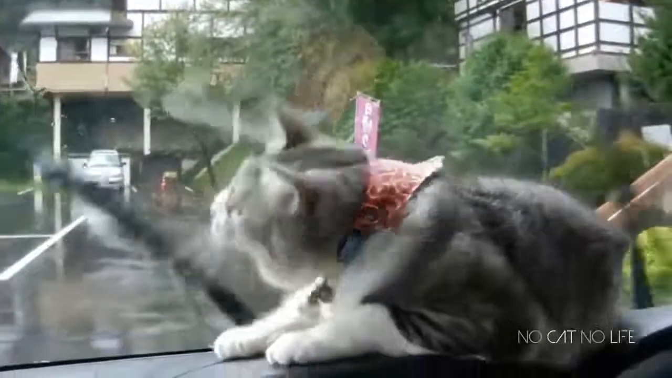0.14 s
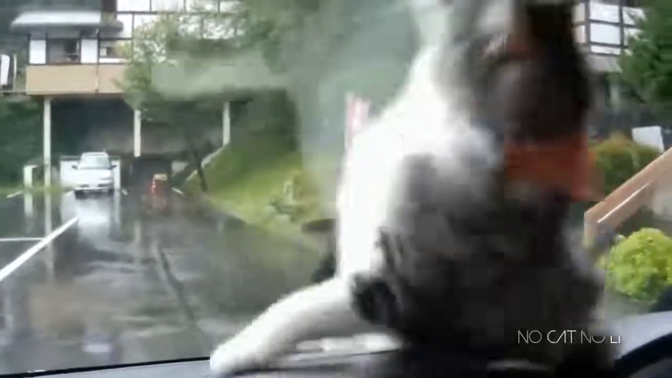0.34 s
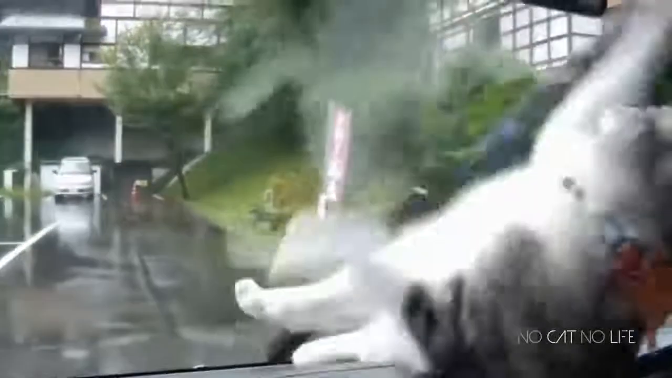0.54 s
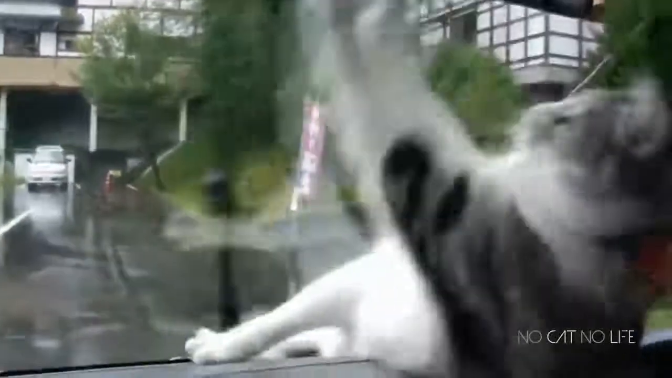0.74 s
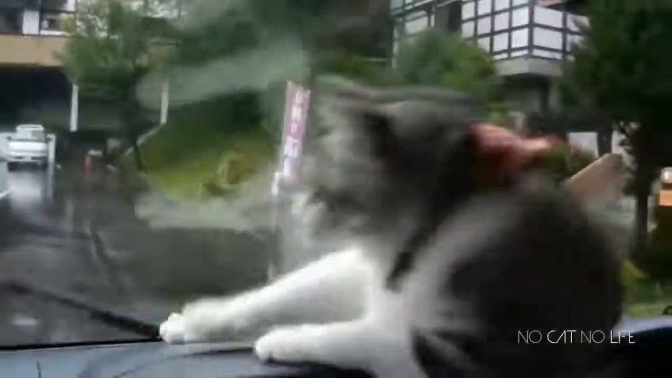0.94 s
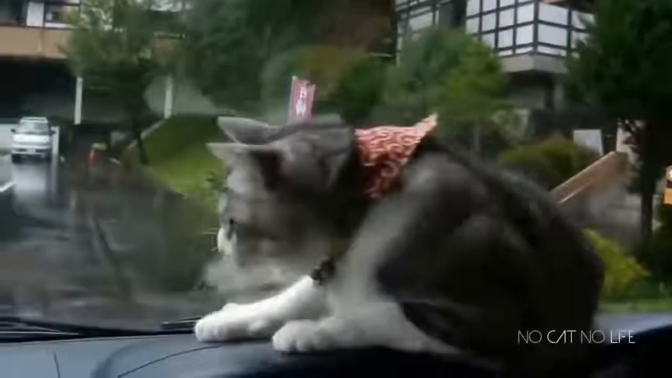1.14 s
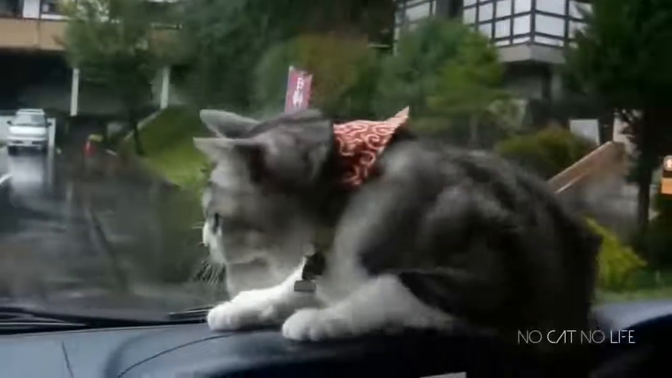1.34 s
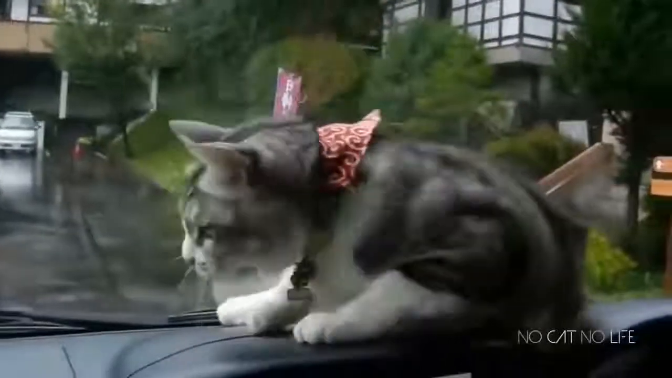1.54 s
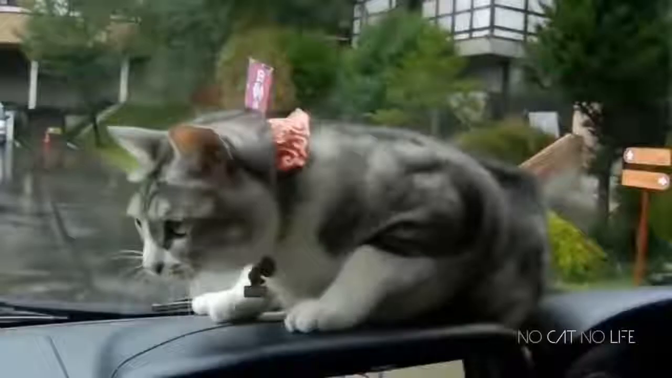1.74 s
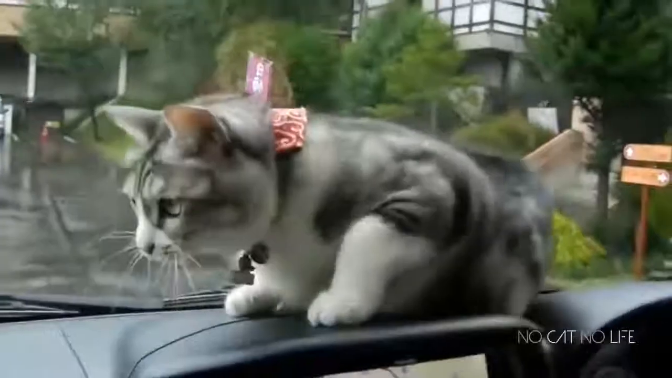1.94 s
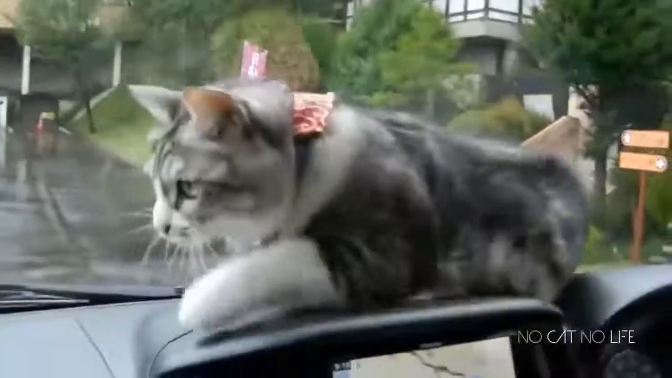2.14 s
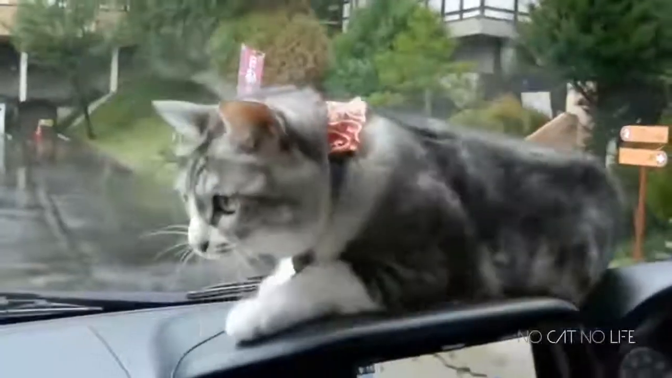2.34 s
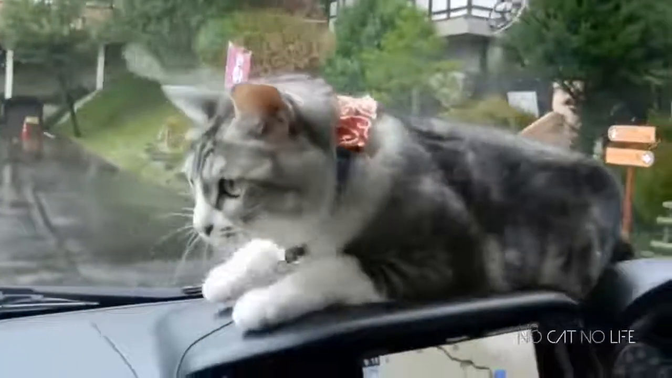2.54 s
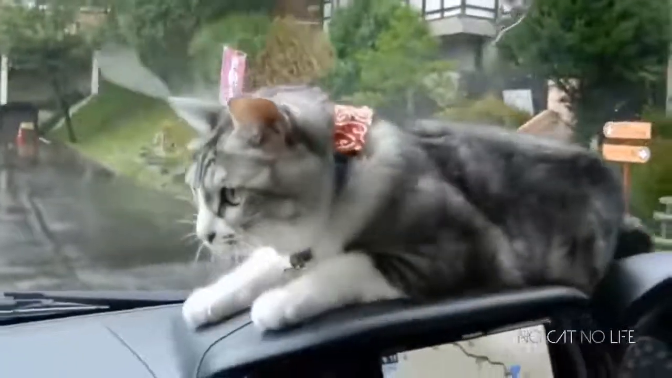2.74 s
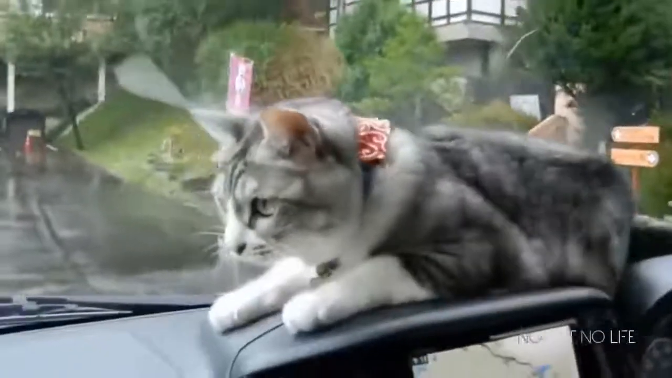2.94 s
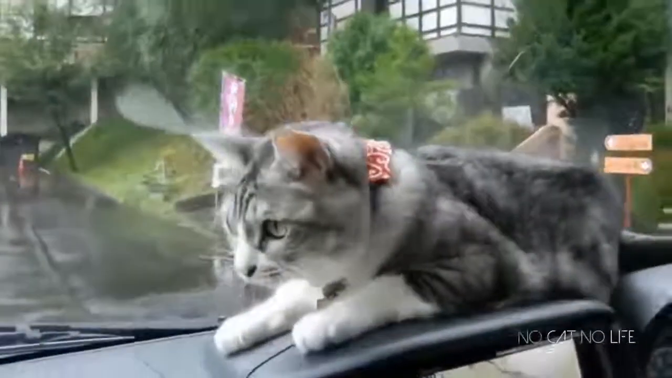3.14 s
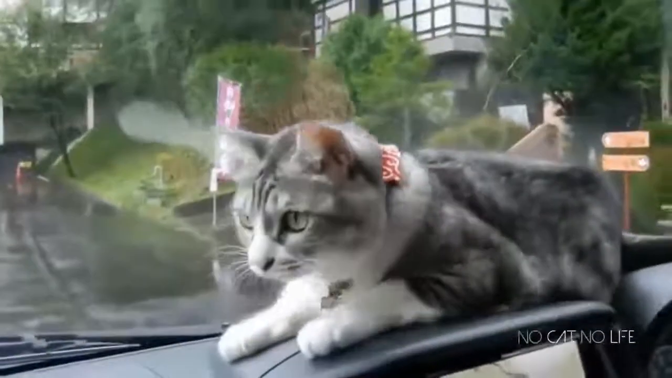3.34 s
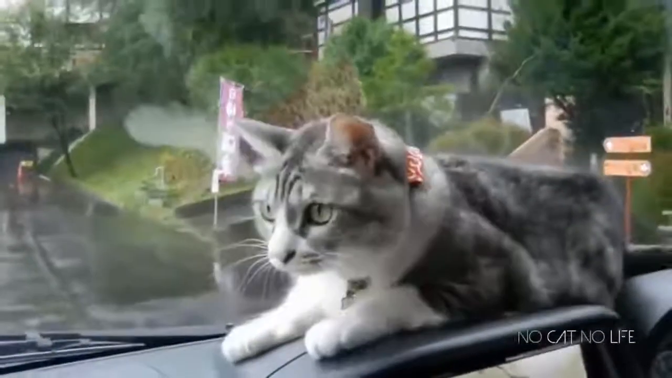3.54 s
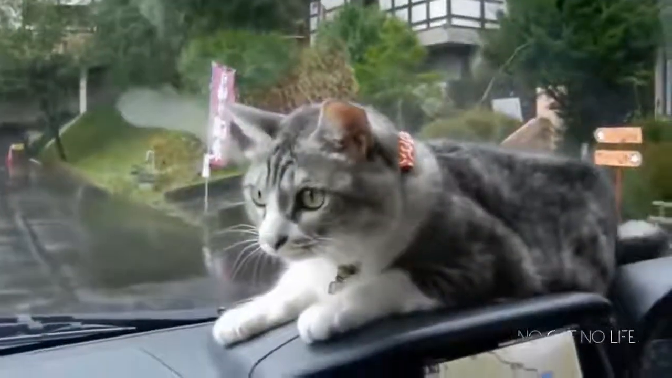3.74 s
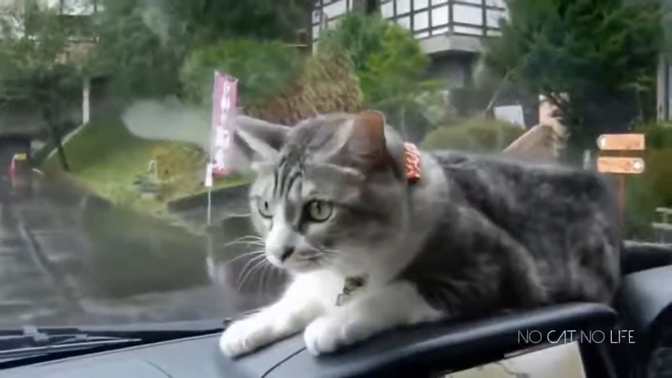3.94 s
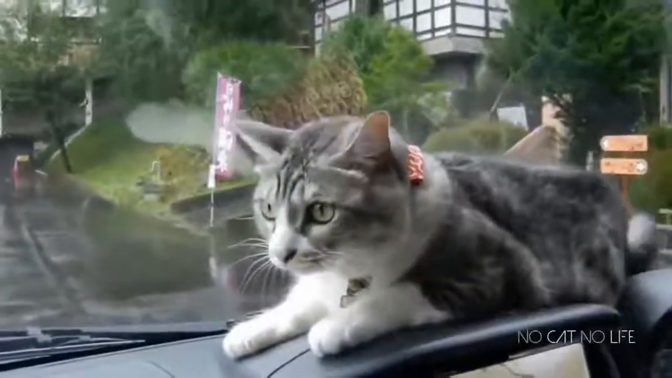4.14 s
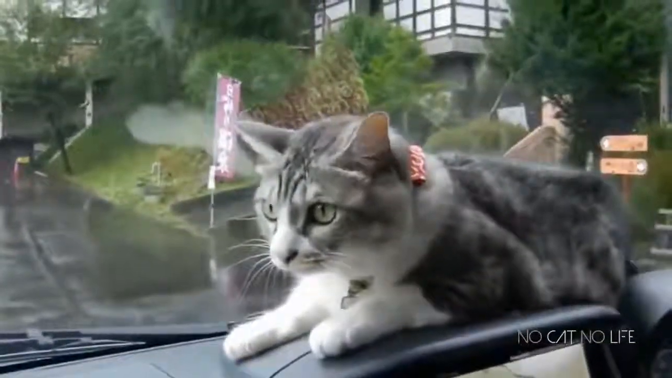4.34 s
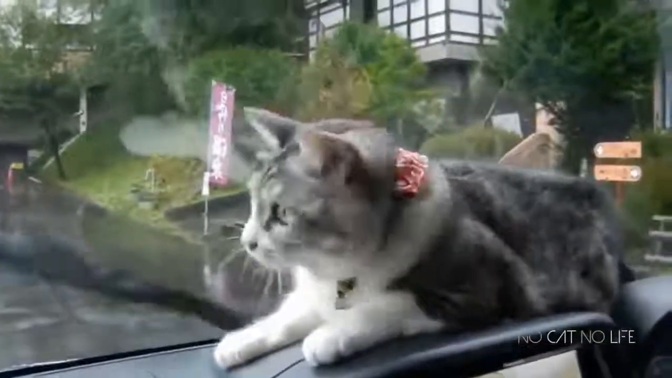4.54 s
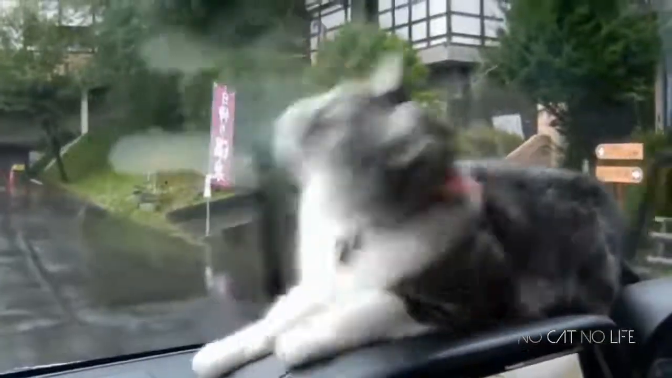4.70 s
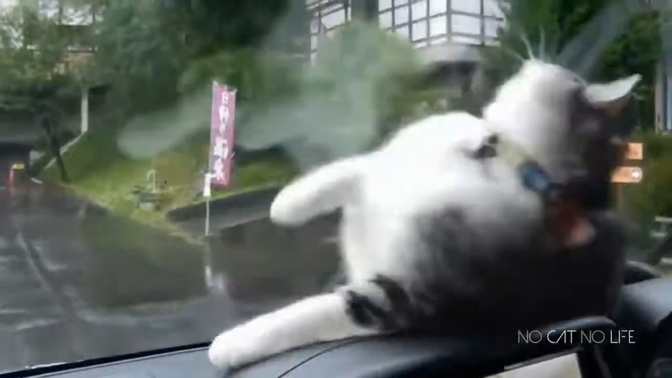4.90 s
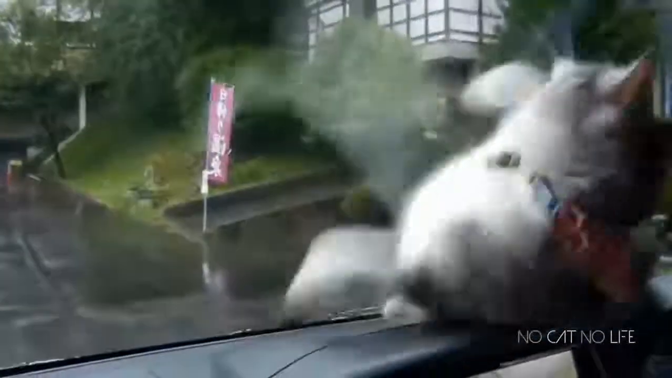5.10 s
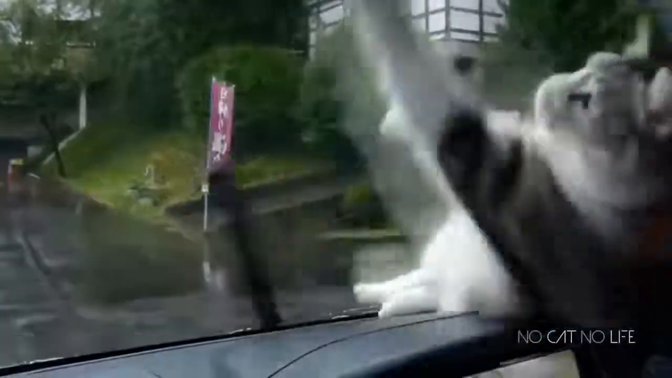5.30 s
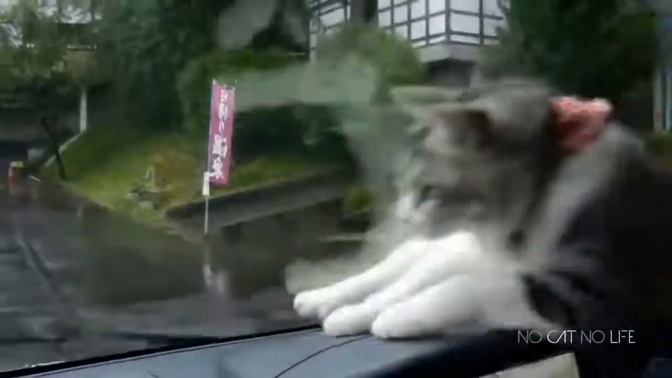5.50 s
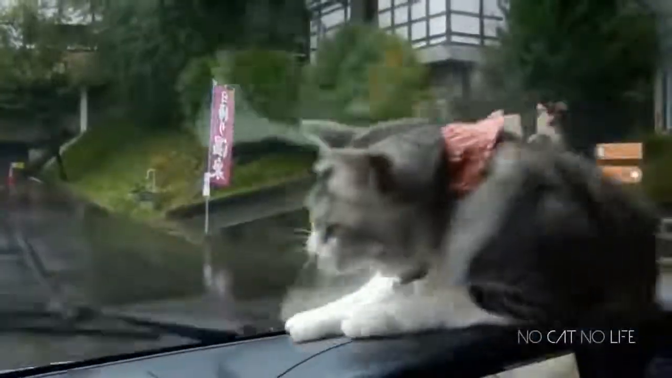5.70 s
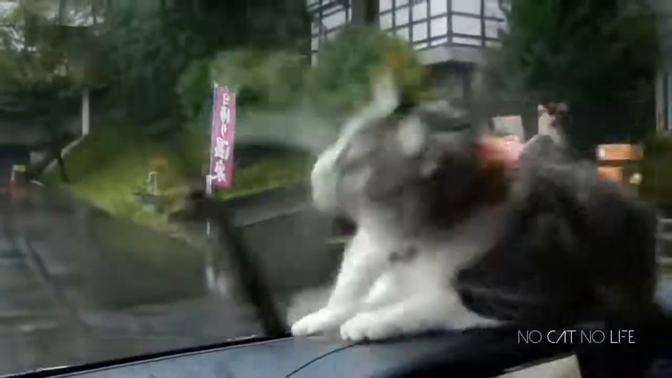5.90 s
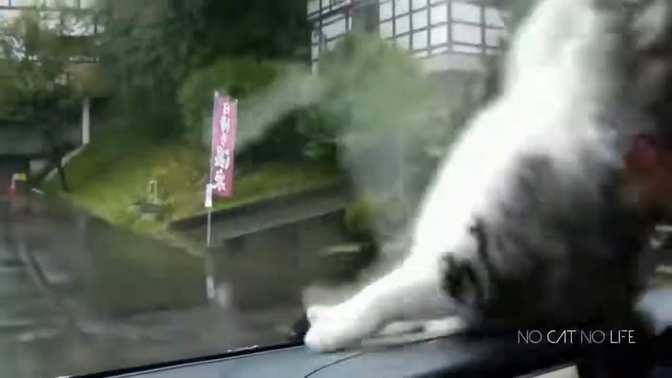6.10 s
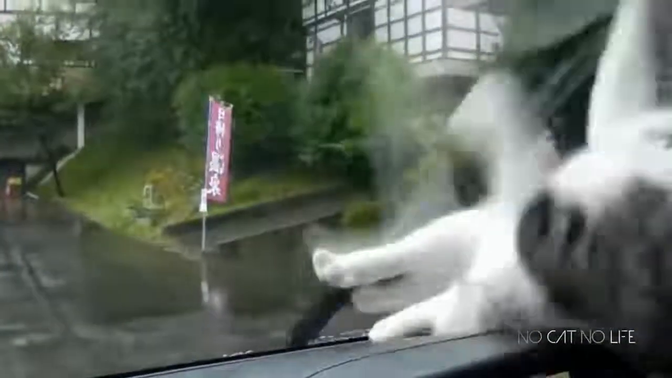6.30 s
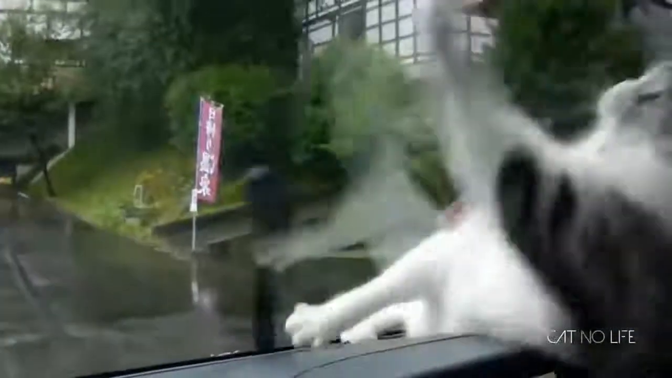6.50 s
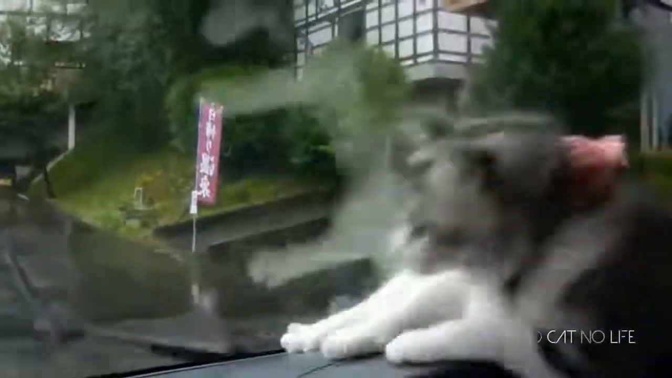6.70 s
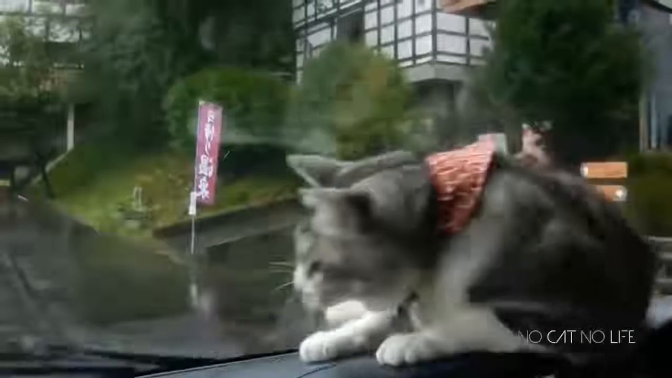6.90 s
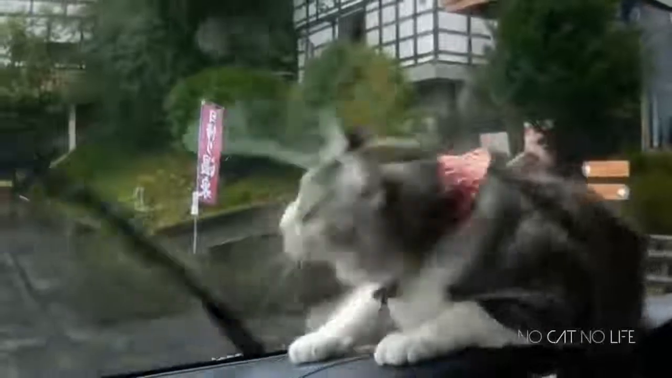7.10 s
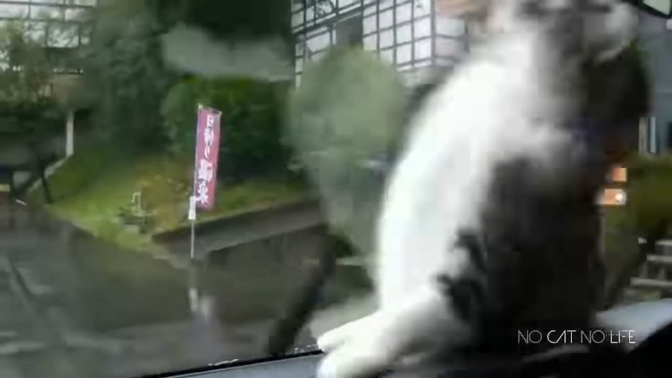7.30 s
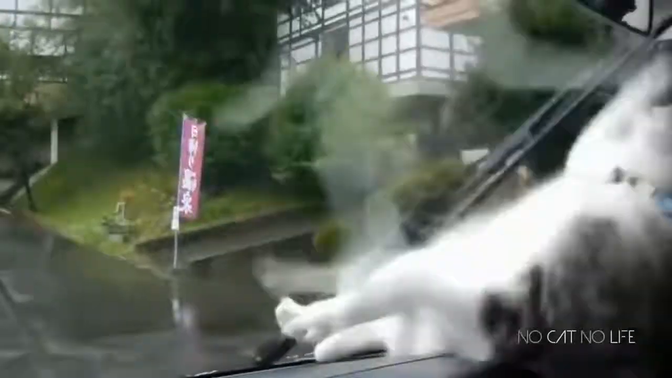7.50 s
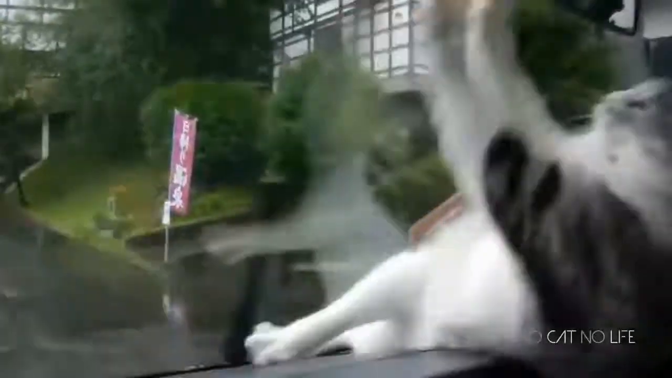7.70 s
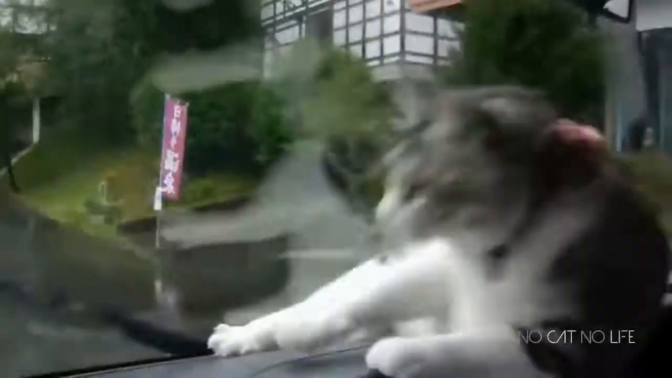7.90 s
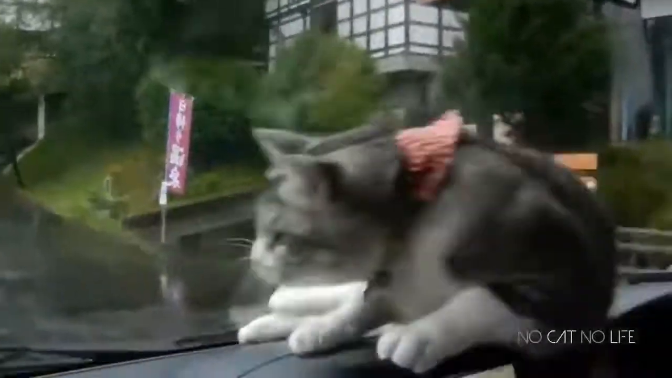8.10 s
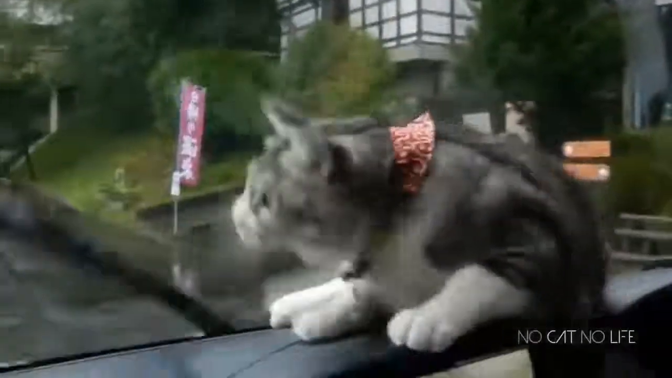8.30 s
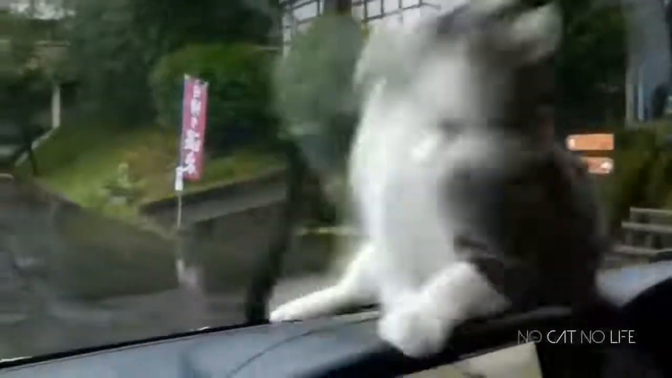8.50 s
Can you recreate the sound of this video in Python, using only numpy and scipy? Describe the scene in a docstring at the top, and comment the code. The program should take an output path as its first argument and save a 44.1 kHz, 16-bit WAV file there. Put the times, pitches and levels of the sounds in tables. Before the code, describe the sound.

Inside an idling car, a microphone near the dashboard picks up a steady low engine boom. The wipers shudder, swish once across wet glass, knock and chirp, while a cat slaps the windscreen and thuds onto the hollow dash, its collar bell jingling. After a lull with soft shuffling and paw steps, the wipers sweep repeatedly and the cat chases them with more slaps, scratches, rustles and jingles.

```python
"""Cat chasing the windscreen wipers

Inside a car idling in light rain, one microphone close to the dashboard, over the engine's boom.
The wiper blades shudder as they set off, swish over wet glass, knock at the top and chirp at the bottom.
A cat slaps the glass, lands on the hollow dash, rustles and jingles its collar bell."""
import sys
import numpy as np
from scipy import signal
from scipy.fft import rfft, irfft, next_fast_len
from scipy.io import wavfile
from scipy.ndimage import uniform_filter1d, map_coordinates

SR = 44100
rng = np.random.default_rng(int(sys.argv[2]) if len(sys.argv) > 2 else 0)


def to_wav(sig):
    """Store sig (one row per channel, or 1-D mono) as 16-bit WAV at the path in sys.argv[1].

    Samples outside -1..1 are clipped; the rate is SR.
    """
    pcm = np.clip(np.atleast_2d(sig), -1, 1) * 32767
    pcm = np.round(pcm).astype(np.int16)
    wavfile.write(sys.argv[1], SR, pcm.T)  # frames by channels


N = 377034

# echo of the cabin: (frequency [Hz], t60 [s])
CABIN_DECAY = [(100, 0.59), (1000, 0.13), (4000, 0.23), (12000, 0.046)]
# idle speed: (time [s], firing rate [Hz])
IDLE_SPEED = [(0, 21.37), (.78, 21.35), (.85, 21.06), (2.24, 21.08), (2.45, 21.35), (6.57, 21.35),
              (6.69, 21.05), (8.55, 21.03)]
# engine orders in the cabin: (multiple of the firing rate [ratio], level [dB])
ENGINE_ORDERS = [(1, -56), (2, -41), (3, -47), (4, -28), (5, -43), (6, -39.5), (7, -51), (8, -42.5),
                 (9, -44.5), (10, -48), (11, -58.5), (12, -60), (17, -51.5), (20, -52), (25, -57),
                 (30, -60.5), (34, -59)]
# rush of air around the microphone: (frequency [Hz], level [dB])
RUSH_SPECTRUM = [(20, -40), (33, -6.5), (49, 9), (60, -2.5), (72, -0.5), (98, 3.5), (118, 0), (150, -0.5),
                 (195, -5.5), (260, -12), (360, -10), (500, -16), (750, -19.5), (1300, -26.5),
                 (2400, -30.5), (4000, -39), (8000, -45.5), (12000, -46)]

# wiper sweeps: (blades break free [s], shudder before that [s], shudder [dB], closing tick [dB],
# motor load [dB], dip in level afterwards [dB])
WIPER_SWEEPS = [(.191, .07, -25, -18, -2, 5), (4.684, .048, -22, -20, 0, 3),
                (5.933, .08, -21.5, -20, -2, 6), (7.176, .081, -20.5, -20, -3, 7),
                (8.421, .085, -22, -18, -5.5, 3)]
# the blades rest after the first sweep:
# (time [s], shudder before that [s], shudder [dB], closing tick [dB], dip in level afterwards [dB])
WIPER_PARK = (1.353, .008, -25, -19, 3)
# the motor over one sweep: (time after breaking free [s], pitch [Hz], level [dB])
MOTOR_WHINE = [(.05, 1050, -68), (.28, 1160, -53), (.44, 1270, -54), (.5, 1314, -46.5), (.58, 1320, -47),
               (.66, 1320, -58), (.76, 1170, -62), (.9, 1250, -54), (1.02, 1318, -50), (1.14, 1316, -52),
               (1.27, 1335, -54)]
# rubbing over one sweep, loudest high on the glass: (time after breaking free [s], level [dB])
RUB_LEVELS = [(-.1, -68), (.04, -54), (.2, -56.5), (.42, -47.5), (.65, -43), (.85, -52.5), (1.12, -48),
              (1.28, -62)]
# rubber on wet glass: (frequency [Hz], level [dB])
WET_GLASS_SPECTRUM = [(150, -2), (400, 24), (900, 19), (1600, 8.5), (2800, 7), (4200, 3), (6500, 5),
                      (8500, -1), (12000, -1)]
# hard slips of the blades: (time [s], peak [dB], ring of the glass against that [dB])
BLADE_JOLTS = [(0.138, -17, -22), (0.162, -19.5, -14), (1.345, -18, -20), (4.641, -21, -18),
               (4.679, -16, -19), (5.251, -18.5, -26), (5.275, -19, -21), (5.853, -18, -13),
               (5.894, -16, -17), (5.908, -26, -7), (7.095, -22, -16), (7.109, -18, -22),
               (7.152, -14.5, -10), (8.336, -16, -10.5), (8.389, -19, -11), (8.405, -21.5, -2)]
# the blades turn at the top: (knock time [s], shudder's head start [s], shudder length [s],
# shudder [dB], thud [dB], knock against thud [dB])
TOP_TURNS = [(0.799, .01, 0.057, -28.5, -22.5, -1), (5.314, 0.063, 0.099, -28, -16.5, -4),
             (6.553, 0.012, .065, -27.5, -19, -9), (7.801, 0.016, .06, -32.5, -17.5, -6)]
# the rubber lips flip at the bottom: (time [s], squeak [dB])
LIP_FLIPS = [(1.272, -38.5), (5.773, -38), (7.021, -40), (8.262, -41)]

# the windscreen's resonances: (frequency [Hz], width [Hz], level [dB])
SCREEN_MODES = [(112, 32, -1), (145, 48, 0), (196, 32, -6), (268, 45, -10.5), (372, 50, -11),
                (430, 40, -16), (700, 120, -22.5), (880, 180, -26), (1900, 700, -38)]
# the glass's short upper modes: (frequency [Hz], level [dB], t60 [s])
GLASS_MODES = [(420, -1, .06), (600, 0, .05), (790, -2, .045), (970, -5, .045), (1300, -14, .04),
               (1900, -18, .02)]
# the hollow dash's modes: (frequency [Hz], level [dB], t60 [s])
DASH_MODES = [(106.6, 7, 0.086), (178.4, 4, 0.086), (236, -1, 0.036), (345, -5.5, 0.084), (516, -9, 0.017),
              (660, -0.5, 0.029), (1020, -22, 0.013)]

# the cat shuffles along the dash: (middle [s], length [s], level [dB])
CAT_SHUFFLES = [(1.996, 0.46, -48), (2.227, 0.17, -48.5), (2.38, 0.22, -57)]
# its coat dragging: (frequency [Hz], level [dB])
COAT_SPECTRUM = [(300, 8), (900, 3.5), (1400, -4), (2050, 0.5), (2900, -8), (4000, -11), (8000, -16.5),
                 (12000, -18)]
# it rears or twists against dash and glass: (middle [s], length [s], level [dB], brightness [dB])
CAT_RUSTLES = [(0.583, 0.13, -41.5, -6.5), (0.72, 0.016, -55, 16.5), (1.088, 0.32, -55.5, -2.5),
               (2.099, 0.017, -47, -5), (4.962, 0.096, -40, -14), (5.111, 0.16, -45.5, -11),
               (5.329, 0.047, -53.5, 11), (5.713, 0.19, -51.5, 1), (5.893, 0.065, -45, -3),
               (6.235, 0.022, -53.5, 13.5), (6.35, 0.19, -46, -2.5), (6.371, 0.025, -34, -25),
               (6.912, 0.17, -52.5, -0.5), (7.028, 0.038, -53, 2.5), (7.336, 0.041, -42.5, -17),
               (7.508, 0.099, -52.5, 0), (7.612, 0.15, -39.5, -10), (7.974, 0.11, -38.5, -21)]
# fur brushing: (frequency [Hz], level [dB])
FUR_SPECTRUM = [(300, 21.5), (900, 16.5), (1700, 17.5), (2800, 14), (4200, 10), (6500, 5.5), (12000, 0)]
# claws sliding: (frequency [Hz], level [dB])
CLAW_SPECTRUM = [(2500, -17), (5000, 1), (6500, 5.5), (8500, -2), (12000, -4)]
# a claw catches: (time [s], peak [dB])
CLAW_CATCHES = [(.563, -32), (.582, -30), (.651, -30), (4.965, -30), (4.977, -28), (5.066, -30),
                (5.152, -33), (5.333, -30), (5.528, -31), (6.24, -32), (7.598, -27), (7.612, -28),
                (7.645, -30), (7.947, -31), (7.962, -28), (7.988, -30)]
# one scratch: (frequency [Hz], level [dB])
SCRATCH_SPECTRUM = [(600, 0), (1800, 3), (3200, -9), (5000, -1), (7500, -4), (12000, -9)]
# the collar bell's shell: (frequency [Hz], level [dB], t60 before extra damping [s])
BELL_MODES = [(5715, -7, 0.11), (5850, -10, 0.025), (6090, -2, 0.04), (6195, 1.5, 0.055), (6350, -5, 0.03),
              (6650, -5, 0.04), (7050, -10, 0.025), (7650, -11, 0.03), (8990, -20, .04),
              (10100, -17, 0.035), (11100, -18, .03)]
# hard shakes of the bell: (time [s], level [dB], rattle length [s])
BELL_SHAKES = [(0.524, -53, .02), (0.614, -32, 0.083), (0.802, -23, 0.014), (1.056, -45, 0.042),
               (1.17, -46, .012), (1.242, -46, 0.016), (1.526, -47, 0.0064), (2.39, -46, 0.0087),
               (2.56, -50, 0.01), (4.815, -38.5, 0.016), (4.845, -34.5, 0.0098), (5.045, -40, 0.0071),
               (5.085, -42, .015), (5.105, -26.5, 0.022), (5.16, -28, 0.016), (5.233, -32.5, 0.01),
               (5.282, -34.5, 0.017), (5.359, -28.5, 0.006), (5.693, -37, 0.018), (5.71, -35, 0.037),
               (5.982, -37, 0.0073), (6.14, -47, 0.014), (6.263, -37, 0.013), (6.32, -34, .012),
               (6.338, -27, 0.02), (6.47, -33, .025), (6.551, -34, 0.013), (6.886, -34, 0.034),
               (6.993, -44, 0.016), (7.593, -28.5, 0.01), (8.125, -44.5, 0.011), (8.271, -39, 0.012),
               (8.444, -39, 0.022)]
# paws land on the dash: (time [s], level [dB], knock against thud [dB])
PAW_STEPS = [(.751, -20, -8), (0.926, -8.5, -20.5), (1.121, -24, -3), (1.553, -25, -7), (1.861, -20.5, -13),
             (2.32, -17, -10.5), (2.801, -9.5, -62), (4.499, -16.5, -11), (5.684, -17.5, -0.5),
             (6.368, -15.5, -6), (6.873, -12.5, -5), (7.475, -17, -16.5), (8.087, -9, -3)]
# paws slap the glass: (time [s], level [dB], claw hiss against pad [dB], contact [s], t60 [s],
# pitch of the smack [ratio], thud [dB], slide [dB])
PAW_SLAPS = [(0.646, -31.5, -18, 0.0031, 0.06, 1.16, -28, -45),
             (.784, -17.5, -5, 0.00896, 0.06, 1.07, -14.5, -37.5),
             (0.917, -24.5, -14, 0.011, 0.07, 1.12, -33, -44),
             (4.598, -33.5, -30, 0.0031, 0.17, 0.88, -25, -56),
             (5.4945, -13, -5.5, 0.0065, 0.02, 1.05, -14, -34),
             (6.507, -15, -30, 0.0039, 0.032, 1, -19.5, -34.5),
             (6.634, -20, -32, 0.018, 0.035, 0.95, -20, -46), (6.715, -35, -20, 0.0031, 0.075, 1, -35, -63),
             (6.803, -35, -1.5, 0.0024, 0.044, 1.1, -22.5, -59),
             (7.7766, -11, -26, 0.0054, .045, 1.09, -17, -40),
             (7.899, -16.5, -24, .004, 0.04, 1.07, -25, -41.5)]
# a paw pad on glass: (frequency [Hz], level [dB])
PAD_SPECTRUM = [(150, -19), (400, -1), (900, -11.5), (1700, -4.5), (2400, 2.5), (3100, 0), (3900, -9.5),
                (5500, -9), (7500, -44), (12000, -43)]

SCUFF_DB = -3.5  # a paw's scuff setting follows its knock by this offset


def amp(db):
    """Decibels to gain."""
    return 10 ** (np.asarray(db) / 20)


def unit(x):
    """Scale to rms 1."""
    return x / np.sqrt(np.mean(x ** 2) + 1e-20)


def unit_peak(x):
    """Scale to peak 1."""
    return x / np.abs(x).max()


def clock(length):
    """Sample times over a length in seconds."""
    return np.arange(round(length * SR)) / SR


def along(points, hz):
    """(Hz, value) points read on a log axis."""
    f, v = np.transpose(points)
    return np.interp(np.log(hz + 1), np.log(f + 1), v)


def curve(rows, outside=None):
    """(s, value) rows as one value per sample."""
    return np.interp(np.arange(N) / SR, *np.transpose(rows), left=outside, right=outside)


def wobble(rate):
    """A smooth random curve, rate knots a second."""
    return map_coordinates(rng.standard_normal(int(N * rate / SR) + 4), [np.arange(N) * rate / SR])


def hump(s, length):
    """A smooth swell of height 1 around time s."""
    return np.exp(-np.minimum((2 * (np.arange(N) / SR - s) / length) ** 2, 20))


def sparse(per_s):
    """Impulses at random times."""
    return rng.random(N) < per_s / SR


def filtered(x, response):
    """x times a response of frequency."""
    m = next_fast_len(len(x) + 8192)
    return irfft(rfft(x, m) * response(np.fft.rfftfreq(m, 1 / SR)), m)[:len(x)]


def coloured(x, spectrum):
    """x given a spectrum, at rms 1."""
    return unit(filtered(x, lambda hz: amp(along(spectrum, hz))))


def noise(n, spectrum):
    """n samples of coloured noise, at rms 1."""
    return coloured(rng.standard_normal(n), spectrum)


def grain(n, depth_db, samples):
    """A rough random gain, smoothed over some samples."""
    return amp(depth_db * unit(uniform_filter1d(rng.standard_normal(n), size=samples)))


def fade(t, t60):
    """Exponential decay."""
    return np.exp(-np.log(1000) * t / max(t60, 1e-3))


def rise(t, attack_s):
    """Exponential onset."""
    return 1 - np.exp(-t / attack_s)


def ring(modes, t, scatter_db, detune):
    """Damped modes, struck at new strengths each time."""
    return sum(amp(db + scatter_db * rng.normal()) * fade(t, t60)
               * np.sin(2 * np.pi * hz * (1 + detune * rng.normal()) * t) for hz, db, t60 in modes)


def add(track, s, sound):
    """Mix a sound into a track at time s."""
    room = track[max(round(s * SR), 0):][:len(sound)]
    room += sound[:len(room)]


def cabin_echo(x):
    """Glass and upholstery, close around the microphone, return a short echo."""
    hz, t, bands = signal.stft(rng.standard_normal(SR // 4), SR, nperseg=256)
    decay = np.exp(-np.log(1000) * t / along(CABIN_DECAY, hz)[:, None])
    tail = signal.istft(bands * decay, SR, nperseg=256)[1]
    return signal.fftconvolve(x, np.pad(tail / np.linalg.norm(tail), (SR // 300, 0)))[:N]


def dips(recover_s, delay_s=.016, fall_s=.048):
    """The level dips briefly after the strong shudders, in dB."""
    dip_db, t = np.zeros(N), clock(1.4)
    for s, *_, depth_db in WIPER_SWEEPS + [WIPER_PARK]:
        add(dip_db, s + delay_s, -depth_db * rise(t, fall_s) * np.exp(-(t / recover_s) ** 2))
    return dip_db


def engine():
    """Heard from inside, the idle orders boom; the rush of air throbs a little with the firing."""
    phase = 2 * np.pi * np.cumsum(curve(IDLE_SPEED) * (1 + .0033 * wobble(7))) / SR
    boom = sum(amp(db + .9 * wobble(8)) * np.sqrt(2) * np.sin(order * phase + rng.uniform(0, 2 * np.pi))
               for order, db in ENGINE_ORDERS)
    rush = amp(-33.5) * noise(N, RUSH_SPECTRUM)
    rumble = filtered(rush, lambda hz: 1 / (1 + (hz / 220) ** 4))
    rush = (rush - rumble) * amp(.4 * wobble(9)) + rumble * amp(.8 * wobble(12))
    throb = 1 + .16 * np.sin(2 * phase)
    return boom * amp(1 + .38 * dips(recover_s=1)) + throb * rush


def motor_whine():
    """The wiper motor's whine climbs in each stroke, out and back, and is loudest at full speed."""
    out, t = np.zeros(N), clock(MOTOR_WHINE[-1][0])
    after, hz, db = np.transpose(MOTOR_WHINE)
    for s, *_, load_db, _ in WIPER_SWEEPS:
        pitch = np.interp(t, after, hz) + (4 * wobble(12) + 15 * wobble(200))[:len(t)]
        level = amp(load_db + np.interp(t, after, db) + 2.8 * wobble(35)[:len(t)])
        add(out, s, level * signal.windows.tukey(len(t), .03) * np.sin(2 * np.pi * np.cumsum(pitch) / SR))
    return out


def rubbing():
    """Strength of the blades' rubbing: the same course in every sweep."""
    return sum(amp(curve([(s + after, db) for after, db in RUB_LEVELS], outside=-120))
               for s, *_ in WIPER_SWEEPS)


def blade_swish():
    """Rubber drags a film of water over the glass, bursting tiny droplets; the linkage rumbles."""
    rub = rubbing()
    droplets = sparse(per_s=700) * rng.standard_normal(N)
    film = rng.standard_normal(N) * amp(.66 * wobble(41))
    hiss = amp(1.6 * wobble(11)) * rub * coloured(unit(film) + .5 * unit(droplets), WET_GLASS_SPECTRUM)
    linkage = noise(N, [(20, 2), (45, 14), (150, 12), (250, .5), (400, -8), (900, -40.5)])
    return hiss + amp(-5) * np.sqrt(rub) * linkage


def rubber(f, soft_hz):
    """A soft contact carries little treble."""
    return 1 / (1 + 1j * f / soft_hz) ** 2


def windscreen(f, shift):
    """The screen's response to a push, its resonances scaled in pitch by shift."""
    return sum((-1) ** k * amp(db) * 1j * f * width / ((shift * hz) ** 2 - f * f + 1j * f * width)
               for k, (hz, width, db) in enumerate(SCREEN_MODES))


def glass_ring():
    """The glass rings briefly under a sudden soft blow; peak 1."""
    t = clock(.1)
    return unit_peak(ring(GLASS_MODES, t, scatter_db=2.5, detune=.04) * rise(t, .001))


def dash_blow(knock_db, scuff_db):
    """One blow on the hollow dash: a thud, with a knock and a scuff if it is hard."""
    t = clock(.28)
    tilt = min(knock_db + 10, 0) / 2  # dB per octave: soft blows lose the upper modes
    modes = [(hz, db + tilt * np.log2(hz / DASH_MODES[0][0]), t60) for hz, db, t60 in DASH_MODES]
    thud = amp(-5) * ring(modes, t, scatter_db=1.5, detune=.03) * rise(t, .003)
    knock = noise(len(t), [(150, -20), (400, 4), (900, -3.5), (1500, -14), (4000, -46)])
    knock *= amp(knock_db - 8) * fade(t, .1)
    scuff = noise(len(t), [(600, 1), (1300, -2), (2000, 4), (3500, -15), (11000, -24)])
    scuff *= amp(scuff_db - 11.5) * fade(t, .091)
    return (thud + knock + scuff) * rise(t, .00031)


def shudder(length, slips_per_s=142, burst_s=.042):
    """The blades stick and slip in uneven bursts, shaking the screen, and ease off before letting go."""
    t = clock(.25)
    shift = 1 + .03 * rng.normal()
    gaps, sizes = rng.standard_normal((2, 40))
    slips = np.cumsum(np.exp(.2 * gaps) / slips_per_s)
    slips -= slips[0]
    held = slips < length
    drive = np.bincount((slips[held] * SR).astype(int), amp(2 * sizes[held]), len(t))[:len(t)]
    drive += .025 * rng.standard_normal(len(t)) * (t < length)
    grip = 1 - .6 * np.exp(np.minimum(t - length, 0) / .012)
    bursts = 1 + .2 * np.cos(2 * np.pi * (t - length + .018) / burst_s)
    shake = filtered(drive * grip * bursts, lambda f: windscreen(f, shift) * rubber(f, soft_hz=1500))
    return shake / np.std(shake[t < length + .015])


def blade_shudders():
    """Setting off or parking, the blades shudder; a short tick and a low bump end each shudder."""
    out, t = np.zeros(N), clock(.15)
    tick = filtered(fade(clock(.05), .0016), lambda f: 1 / (1 + 1j * f / 1700) ** 2)  # dulled treble
    for s, length, db, tick_db, *_ in WIPER_SWEEPS + [WIPER_PARK]:
        add(out, s - length, amp(db) * shudder(length))
        add(out, s, amp(tick_db) * tick / tick.max())
        add(out, s, amp(db) * ring(DASH_MODES[:1], t, scatter_db=1, detune=.03))
    return out


def blade_jolts():
    """The hardest slips of a shudder are single rubbery knocks on the screen."""
    out = np.zeros(N)
    for s, db, ring_db in BLADE_JOLTS:
        shift = 1.04 + .05 * rng.normal()
        knock = filtered(fade(clock(.12), .003), lambda f: windscreen(f, shift))
        add(out, s, amp(db) * unit_peak(knock))
        add(out, s, amp(db + ring_db) * glass_ring())
    return out


def blade_turns():
    """At the top of a sweep the blades shudder and the arms knock through the dash."""
    out = np.zeros(N)
    for s, lead, length, shudder_db, thud_db, knock_db in TOP_TURNS:
        add(out, s - lead, amp(shudder_db) * shudder(length))
        add(out, s, amp(thud_db) * dash_blow(knock_db, scuff_db=-36))
    return out


def lip_flips(squeak_hz=1347, bump_hz=125):
    """At the bottom of a sweep the rubber lip flips over with a bump and a short, raspy squeak."""
    out, t = np.zeros(N), clock(.028)
    swell = np.sin(np.pi * t / t[-1])
    bump = amp(14) * np.sin(2 * np.pi * bump_hz * t)
    rasp_spectrum = [(500, -6), (750, -3), (1000, -2), (1150, -8), (1350, 0), (1650, -12), (4000, -26)]
    for s, db in LIP_FLIPS:
        rasp = amp(-4) * noise(len(t), rasp_spectrum)
        squeak = np.sin(2 * np.pi * squeak_hz * (1 + .004 * rng.normal()) * t)
        add(out, s, amp(db) * swell * (squeak + rasp + bump))
    return out


def coat_shuffles():
    """The cat settles, its coat dragging unevenly over the dash."""
    pressure = sum(amp(db) * hump(s, length) for s, length, db in CAT_SHUFFLES)
    return pressure * amp(1.1 * wobble(60)) * noise(N, COAT_SPECTRUM)


def fur_rustles(slide_delay_s=.0062, slide_s=.055):
    """Brushing fur and sliding paws swell in clumps of fine grain and snag; claws add a scratchy hiss."""
    slides = [(s + slide_delay_s, slide_s, db, 0) for s, *_, db in PAW_SLAPS]
    soft, bright = np.zeros((2, N))
    for s, length, db, bright_db in CAT_RUSTLES + slides:
        pressure = amp(db) * hump(s, length)
        soft += pressure
        bright += amp(bright_db) * pressure
    fur, hiss = rng.standard_normal((2, N)) * amp(2.2 * wobble(260))
    catches = sparse(per_s=440) * rng.standard_normal(N)
    claws = coloured(unit(hiss) + amp(-7) * unit(catches), CLAW_SPECTRUM)
    snags = sparse(per_s=40) * rng.uniform(.3, 1, N)
    drag = unit(1 + 1.8 * signal.fftconvolve(snags, fade(clock(.05), t60=.03))[:N])
    flicker = amp(1.8 * wobble(45))
    return flicker * drag * (soft * coloured(fur, FUR_SPECTRUM) + bright * claws)


def claw_scratches():
    """Single claws catch and skip over glass and dash."""
    out, t = np.zeros(N), clock(.05)
    for s, db in CLAW_CATCHES:
        skips = rng.standard_normal(len(t)) * grain(len(t), depth_db=5, samples=40)
        scratch = coloured(skips, SCRATCH_SPECTRUM) * fade(t, t60=.035) * rise(t, .001)
        add(out, s, amp(db) * unit_peak(scratch))
    return out


def jingle(length, linger_t60=.8):
    """The pellet rolls in the slotted shell, each strike favouring other modes; the lowest lingers."""
    out = amp(-33) * ring([(BELL_MODES[0][0], 0, linger_t60)], clock(.5), scatter_db=3, detune=.001)
    t = clock(.2)
    roll_spectrum = [(3000, -28), (5000, -17), (5900, 0), (6800, -2), (8500, -10), (12000, -13)]
    for share in [0, *rng.random(size=3)]:
        scrape = amp(-2.5) * fade(t, .06) * noise(len(t), roll_spectrum)
        shell = ring(BELL_MODES, t, scatter_db=7, detune=.009) * fade(t, rng.uniform(.08, .5))
        ping = (shell + scrape) * rise(t, .0014)
        add(out, share * length, amp(-1.5) * unit_peak(ping))
    return out


def collar_bell():
    """The bell jingles at each hard shake, and taps lightly at random as the cat follows the blades."""
    out, chase = np.zeros(N), rubbing()
    for s, db, length in BELL_SHAKES:
        add(out, s, amp(db) * jingle(length))
    for at in np.flatnonzero(sparse(per_s=14) & (chase > amp(-54))):
        add(out, at / SR, chase[at] * amp(.5 + 2.5 * rng.normal()) * jingle(length=.04))
    return out


def paw_steps():
    """The cat's weight lands on the dash; the harder the knock, the louder the scuff."""
    out = np.zeros(N)
    for s, db, knock_db in PAW_STEPS:
        add(out, s, amp(db) * dash_blow(knock_db, knock_db + SCUFF_DB))
    return out


def paw_slaps(lead_s=.03, knock_db=-10.5):
    """A paw brushes the glass, smacks it and skids off on its claws; the push thuds into the dash."""
    out, t = np.zeros(N), clock(.35) - lead_s
    after, before = np.maximum(t, 0), np.minimum(t, 0)
    for s, db, claw_db, contact, t60, pitch, thud_db, _ in PAW_SLAPS:
        press = .8 * fade(np.maximum(t - contact, 0), t60)
        smack = (press + .55 * fade(after, .015)) * np.exp(before / .0009)
        brush = amp(-18) * fade(after, .2) * np.exp(before / .008)
        envelope = (smack + brush) * grain(len(t), depth_db=1.6, samples=70)
        pad = noise(len(t), [(pitch * hz, level) for hz, level in PAD_SPECTRUM])
        claws = amp(claw_db) * noise(len(t), CLAW_SPECTRUM)
        add(out, s - lead_s, amp(db - 8.5) * envelope * (pad + claws))
        add(out, s + .00394, amp(thud_db) * dash_blow(knock_db, knock_db + SCUFF_DB))
        add(out, s + contact / 2, amp(thud_db - 10) * glass_ring())
    return out


def scene():
    """Engine, wipers and cat, all close to one microphone in the cabin."""
    blades = blade_shudders() + blade_jolts() + blade_turns() + lip_flips()
    cat = paw_slaps() + paw_steps() + fur_rustles() + claw_scratches() + collar_bell()
    echo = amp(-16) * cabin_echo(blades + cat)
    bed = engine() + coat_shuffles() + blade_swish() + motor_whine()
    return (amp(dips(recover_s=.15)) * (bed + blades + cat + echo))[None]


def record(dry):
    """The camera's microphone passes nothing above its band limit."""
    top_hz = 12150
    return np.array([filtered(channel, lambda hz: hz < top_hz) for channel in dry])


dry = scene()
out = record(dry)
to_wav(out)
```